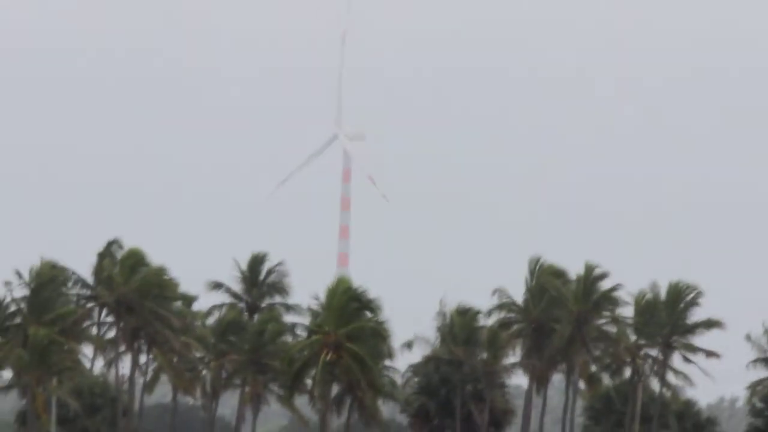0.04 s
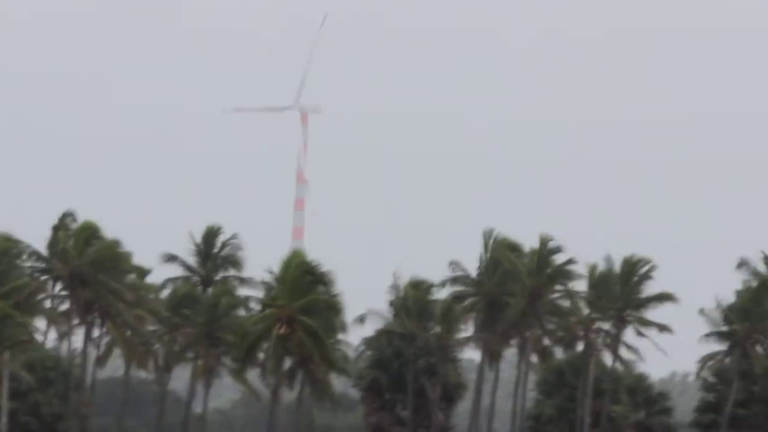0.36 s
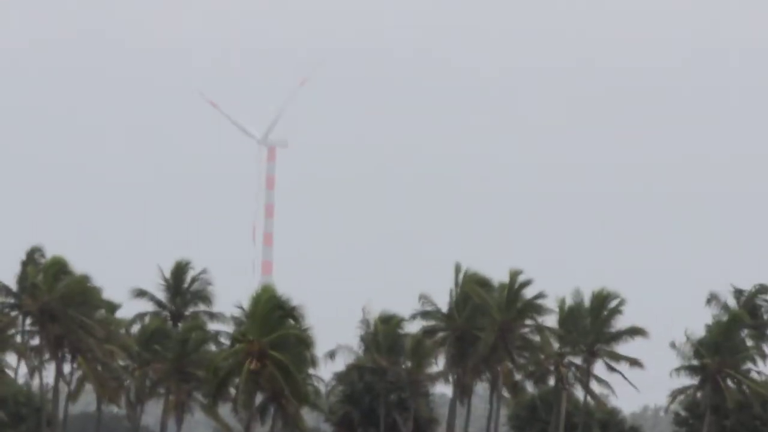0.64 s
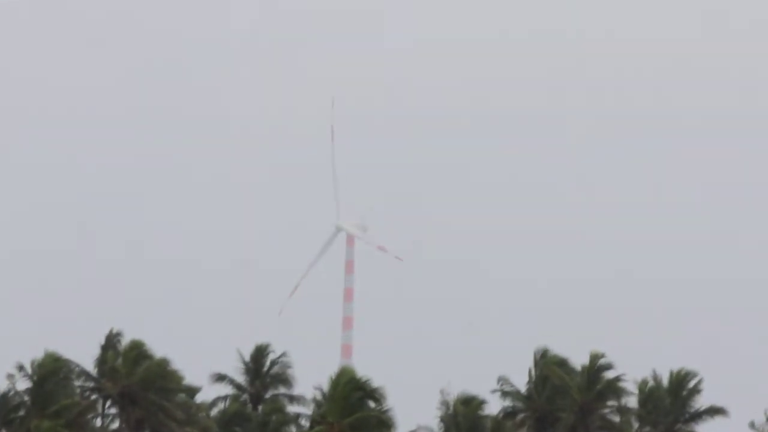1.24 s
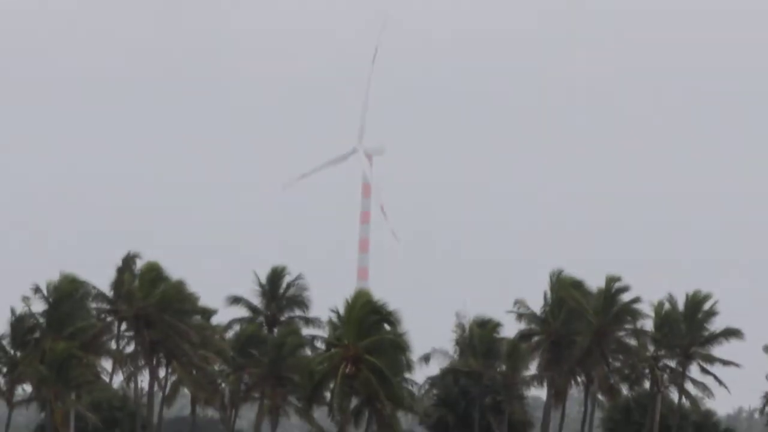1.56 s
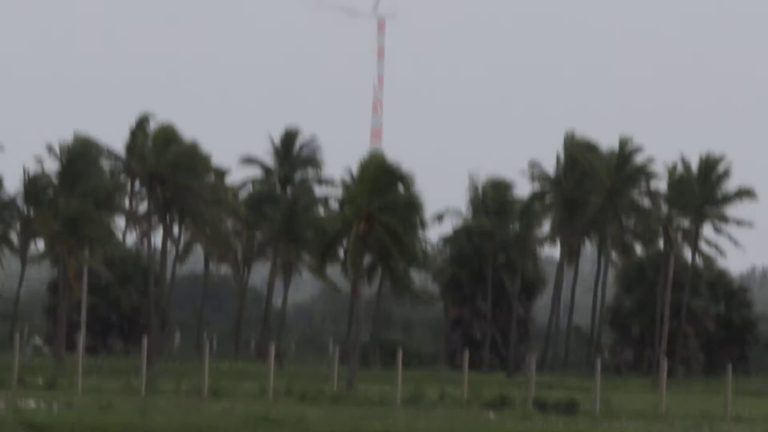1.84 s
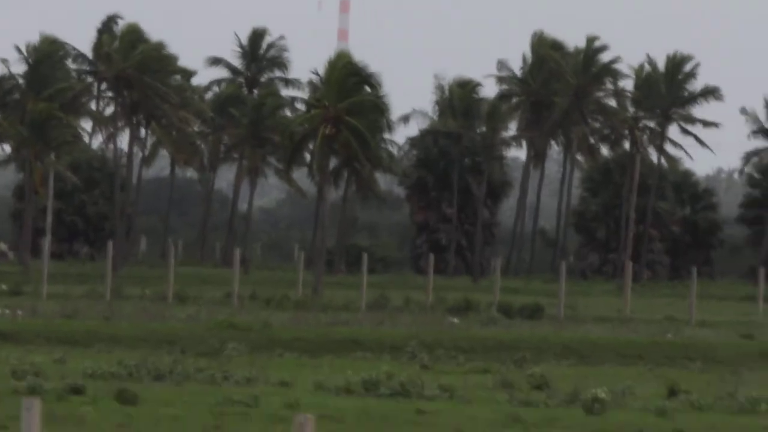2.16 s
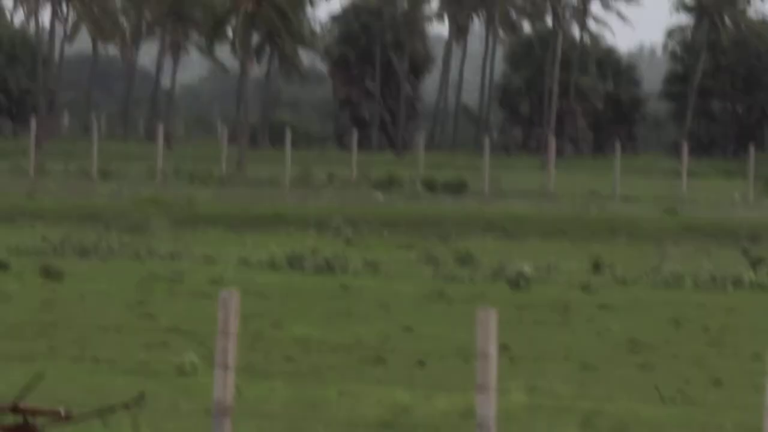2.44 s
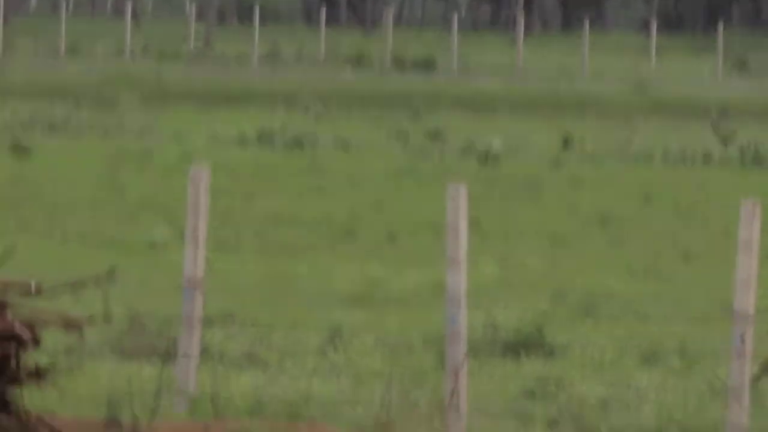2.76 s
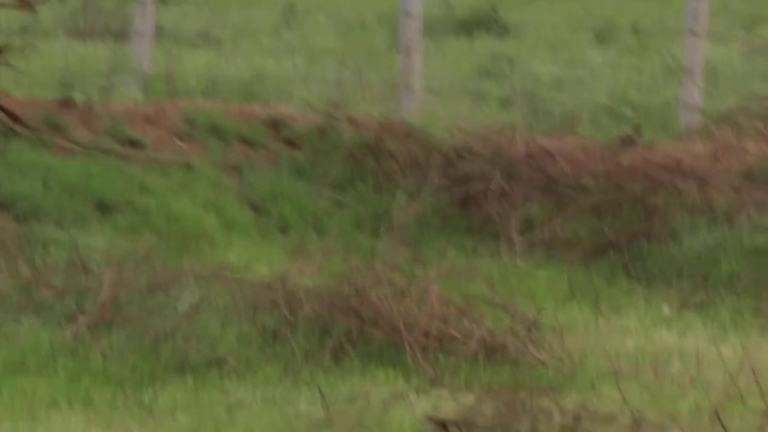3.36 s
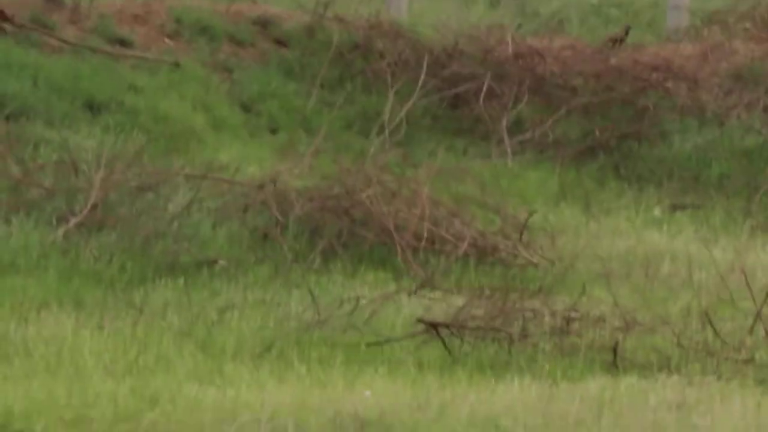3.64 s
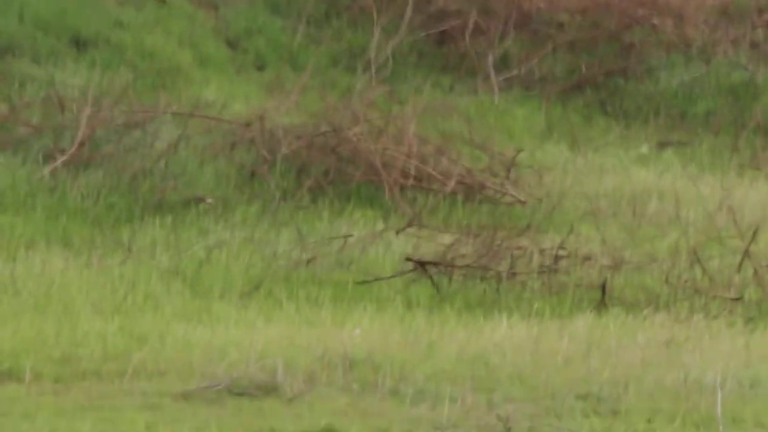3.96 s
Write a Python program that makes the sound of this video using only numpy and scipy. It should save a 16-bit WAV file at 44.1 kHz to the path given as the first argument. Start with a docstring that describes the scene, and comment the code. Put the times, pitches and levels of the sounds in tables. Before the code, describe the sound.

Wind buffets the microphone in quick, irregular gusts, making a low, fluttering rumble that eases a little near the end. Behind it, distant palms rustle faintly across an open field, with a few small leaf crackles and ticks.

```python
"""Wind on a camera microphone

Gusts buffet a hand-held camera in a field edged by palms. Eddies rumble at the microphone port,
brighter as the air speeds up. Far fronds rustle, nearer leaves crackle; a faint trill, a hollow
swish and dry ticks come and go. Gain control ducks everything, the camera's own hiss and whine
included, after each hard gust."""
import sys
import numpy as np
from scipy import signal
from scipy.fft import rfft, irfft
from scipy.io import wavfile
from scipy.ndimage import uniform_filter1d, minimum_filter1d

SR = 44100
rng = np.random.default_rng(int(sys.argv[2]) if len(sys.argv) > 2 else 0)


def persist_wave(psi):
    """Save psi, clipped to +-1, as 16-bit WAV."""
    counts = np.round(np.clip(psi, -1, 1) * 32767).astype(np.int16)
    wavfile.write(sys.argv[1], SR, np.atleast_2d(counts).T)


N = 176400
TIME_S, FREQ_HZ = np.arange(N) / SR, np.fft.rfftfreq(N, 1 / SR)

# airflow at the port (time [s], relative level [dB], base eddy corner [Hz])
AIRFLOW = [(0.0, 0, 114), (0.1, -18, 290), (0.22, -14, 423), (0.33, -12.5, 390), (0.5, -8.5, 550),
           (0.7, -17, 364), (0.84, -14, 364), (1.02, -11.5, 390), (1.29, -18, 226), (1.46, -10.5, 270),
           (1.62, -9.5, 190), (1.72, -13.5, 150), (1.88, -14.5, 390), (2.02, -16, 600), (2.1, -23, 136),
           (2.21, -22, 114), (2.33, -6, 68), (2.43, -24.5, 180), (2.58, -23, 61), (2.7, -7.5, 90),
           (2.82, -10.5, 250), (2.92, -35, 225), (2.98, -12, 12), (3.12, -20, 28), (3.19, -12.5, 285),
           (3.28, -20, 184), (3.47, -13, 220), (3.62, -18, 500), (3.76, -27, 264), (3.89, -22, 431),
           (4.0, -27, 130)]
# single gusts (centre [s], length [s], relative level [dB], base eddy corner [Hz])
GUSTS = [(0.003, 0.013, -4.5, 503), (0.083, 0.0094, -5.5, 220), (0.145, 0.034, -6, 333),
         (0.173, 0.013, -2.5, 530), (0.275, 0.03, -13, 650), (0.315, 0.013, -26, 420),
         (0.359, 0.012, -8, 540), (0.389, 0.016, -1, 450), (0.418, 0.022, 0, 543),
         (0.473, 0.008, -3.5, 1000), (0.493, 0.03, -8, 523), (0.534, 0.011, -8, 702),
         (0.572, 0.015, -10.5, 494), (0.603, 0.0096, -7, 573), (0.628, 0.02, -10.5, 483),
         (0.661, 0.04, -15, 486), (0.727, 0.026, -11.5, 348), (0.772, 0.015, -5.5, 456),
         (0.865, 0.0081, -11, 401), (0.894, 0.01, -12.5, 630), (0.914, 0.011, -9, 389),
         (0.953, 0.015, -5, 722), (0.985, 0.029, -12, 797), (1.023, 0.013, -16.5, 623),
         (1.075, 0.028, -3, 534), (1.132, 0.018, -8.5, 478), (1.172, 0.015, -15, 615),
         (1.194, 0.025, -9.5, 452), (1.226, 0.024, -6, 352), (1.319, 0.01, -9.5, 283),
         (1.375, 0.029, -10.5, 327), (1.4, 0.02, -10.5, 318), (1.427, 0.013, 0, 678),
         (1.482, 0.023, -13.5, 468), (1.512, 0.0063, -3, 324), (1.548, 0.0095, -14, 264),
         (1.6, 0.018, 4.5, 310), (1.724, 0.0084, -10.5, 316), (1.775, 0.011, -12, 552),
         (1.811, 0.015, -13.5, 701), (1.847, 0.039, -5, 470), (1.892, 0.048, -11.5, 343),
         (1.978, 0.025, -6, 425), (2.01, 0.0056, -4.5, 534), (2.164, 0.023, -9.5, 377),
         (2.242, 0.022, -15, 310), (2.28, 0.005, -21.5, 290), (2.335, 0.035, -15, 424),
         (2.377, 0.028, -11, 280), (2.485, 0.023, -6, 202), (2.543, 0.017, -20.5, 212),
         (2.656, 0.021, -10.5, 345), (2.684, 0.014, -22.5, 420), (2.74, 0.025, -9.5, 267),
         (2.78, 0.032, -4, 330), (2.838, 0.011, -6, 307), (2.907, 0.032, -17.5, 326),
         (3.173, 0.029, -8, 318), (3.225, 0.011, -24.5, 498), (3.336, 0.038, -16, 294),
         (3.372, 0.016, -14.5, 306), (3.432, 0.0099, -20.5, 326), (3.51, 0.025, -21.5, 380),
         (3.558, 0.03, -6.5, 379), (3.609, 0.014, -9, 460), (3.64, 0.02, -11.5, 580),
         (3.67, 0.031, -13.5, 634), (3.699, 0.018, -9.5, 910), (3.801, 0.02, -15.5, 565),
         (3.868, 0.026, -12, 730), (3.935, 0.0087, -10, 290), (3.983, 0.016, -17, 525)]
# port response (frequency [Hz], gain [dB])
PORT_RESPONSE = [(20, -15.5), (45, -3), (110, 3), (250, 2.5), (500, 0), (1000, -0.5), (2000, -1),
                 (3000, -7.5), (4200, -17), (6000, -29.5)]
# far palm wash (frequency [Hz], relative density [dB])
PALM_SPECTRUM = [(100, 6), (350, -1), (600, 1.5), (900, -4), (1300, -6), (1900, -9.5), (2400, -12.5),
                 (3100, -20.5), (4500, -24), (6500, -32), (10000, -39)]
# far palm wash (time [s], level [dB])
PALM_ENVELOPE = [(0, -43), (.6, -44.5), (.85, -41.5), (1.2, -43.5), (1.6, -42.5), (1.95, -43), (2.14, -40),
                 (2.3, -42), (2.7, -40.5), (2.9, -41.5), (3.1, -39), (3.4, -40.5), (4, -41)]
# camera hiss (frequency [Hz], relative density [dB])
HISS_SPECTRUM = [(100, -3), (4000, 6), (7500, 1), (11000, -0.5), (15500, 0.5)]
# camera whines (frequency [Hz], width [Hz], level [dB])
WHINES = [(15715, 12, -62.5), (7450, 250, -79.5)]
# high trill (time [s], level [dB])
TRILL_ENVELOPE = [(.7, -87), (.9, -79), (1.4, -78.5), (1.7, -77.5), (1.9, -91.5), (2.15, -76), (2.47, -73),
                  (2.55, -90)]
# near leaf crackles (onset [s], nominal peak [dB], centre [Hz])
CRACKLES = [(.783, -43, 3900), (.794, -42, 4000), (.820, -40.5, 4300), (.902, -44, 4000),
            (1.513, -41, 4100), (1.530, -44, 4000), (2.084, -43.5, 3900), (2.107, -42, 3900),
            (2.128, -41, 4000), (2.166, -38, 4000), (3.151, -47, 4840), (3.375, -44, 4000),
            (3.93, -42.5, 3200)]
# hollow swish (time [s], level [dB], centre [Hz])
SWISH_TRACK = [(.95, -68, 1800), (1.05, -50, 1750), (1.2, -42, 1700), (1.31, -51, 1640), (1.37, -73, 1645),
               (1.98, -70, 1700), (2.08, -48, 1750), (2.18, -51, 1750), (2.27, -62, 2200),
               (2.35, -51, 2350), (2.48, -52, 2350), (2.62, -65, 2300)]
# dry ticks (onset [s], nominal peak [dB])
TICKS = [(1.184, -26), (1.241, -24.5), (1.614, -30), (3.176, -35)]


def amp(db):
    """Decibels to gain."""
    return 10 ** (np.asarray(db) / 20)


def unit_rms(x):
    """Scale to rms 1."""
    return x / np.sqrt(np.mean(x ** 2) + 1e-20)


def curves(rows, time_s=TIME_S):
    """Linear interpolation of each column of a time table."""
    knots_s, *columns = np.transpose(rows)
    return [np.interp(time_s, knots_s, column) for column in columns]


def spectrum_gain(rows, hz=FREQ_HZ):
    """Gain from a spectrum table, log-frequency axis."""
    knots_hz, db = np.transpose(rows)
    return amp(np.interp(np.log(hz + 1), np.log(knots_hz), db))


def noise(gain):
    """Spectrally shaped noise, rms 1."""
    return unit_rms(irfft(rfft(rng.standard_normal(N)) * gain, N))


def noisy_tone(hz, width_hz):
    """Narrow noise on a carrier, rms 1."""
    shape = 1 / (1 + (2 * FREQ_HZ / width_hz) ** 4)
    phase = 2 * np.pi * np.cumsum(hz * np.ones(N)) / SR
    return unit_rms(noise(shape) * np.cos(phase) + noise(shape) * np.sin(phase))


def burst(onset_s, peak_db, decay_s):
    """Exponential envelope for noise of crest factor 2."""
    decay = np.exp(-np.minimum(abs(TIME_S - onset_s) / decay_s, 20))
    return amp(peak_db) / 2 * (TIME_S >= onset_s) * decay


def eddy_density(hz, db, corner_hz, rolloff=4.33):
    """Turbulence power per Hz: flat at low frequency, steep fall past the corner."""
    return np.pi * amp(db) ** 2 / corner_hz / (1 + (hz / corner_hz) ** 2) ** rolloff


def port_power(bands_hz, time_s, brightness):
    """Half-octave eddy power of flow plus steep-flanked gusts, filtered by the port."""
    flow_trim_db, gust_brightening, gust_steepness, low_cut_hz = -1, 1.079, 3.36, 79
    flow_db, flow_hz = curves(AIRFLOW, time_s)
    density = eddy_density(bands_hz, flow_db + flow_trim_db, flow_hz * brightness)
    for centre_s, length_s, db, base_hz in GUSTS:
        near = abs(time_s - centre_s) < length_s
        swell = np.exp(-abs(2 * (time_s[near] - centre_s) / length_s) ** gust_steepness)
        corner_hz = base_hz * gust_brightening * np.sqrt(brightness[near])  # half the flow's flutter
        density[:, near] += swell * eddy_density(bands_hz, db, corner_hz)
    width_hz = bands_hz * np.log(2) / 2
    response = spectrum_gain(PORT_RESPONSE, bands_hz) ** 2 / (1 + (low_cut_hz / bands_hz) ** 2)
    return density * width_hz * response


def half_octave(hz):
    """Soft-edged noise band around hz."""
    octaves = np.log2((FREQ_HZ + 1e-9) / hz)
    return noise(np.cos(np.pi / 2 * np.clip(2 * octaves, -1, 1)))


def steadied(x, power, window_s=0.029, share=0.81):
    """Pull the short-term power of x toward a target curve."""
    span = int(window_s * SR)
    target, actual = (abs(uniform_filter1d(uniform_filter1d(p, span), span // 2)) + 1e-12
                      for p in (power, x ** 2))
    return x * np.sqrt(target / actual) ** share


def wind(level_db=-1, flutter_db=1.46, flutter_octaves=0.27):
    """Eddies at the port; turbulence shakes their strength and brightness together."""
    control_s = TIME_S[::32]
    low_hz, high_hz = 29.2, 198
    flutter_band = 1 / (1 + (low_hz / (FREQ_HZ + 1)) ** 4) / (1 + (FREQ_HZ / high_hz) ** 4)
    flutter = np.interp(control_s, TIME_S, noise(flutter_band / np.sqrt(FREQ_HZ + 1)))
    bands_hz = 20 * 2 ** (np.arange(17) / 2)
    power = port_power(bands_hz[:, None], control_s, brightness=2 ** (flutter_octaves * flutter))
    rumble = np.zeros(N)
    for group in np.split(np.arange(len(bands_hz)), [7, 10]):  # low, mid, high
        eddies = sum(half_octave(bands_hz[k]) * np.interp(TIME_S, control_s, np.sqrt(power[k]))
                     for k in group)
        rumble += steadied(eddies, np.interp(TIME_S, control_s, power[group].sum(0)))
    return rumble * amp(level_db + flutter_db * np.interp(TIME_S, control_s, flutter))


def far_palms():
    """Distant fronds merge into a smooth wash."""
    return noise(spectrum_gain(PALM_SPECTRUM)) * amp(curves(PALM_ENVELOPE)[0])


def leaf_noise(hz, width_octaves=0.28):
    """Noise band of a leaf, Gaussian in log frequency."""
    return noise(np.exp(-0.5 * (np.log2((FREQ_HZ + 1) / hz) / width_octaves) ** 2))


def near_leaves(snaps_per_s=23, rustle_db=-76.5, spread_db=5, decay_s=0.0058):
    """Nearer leaves: a faint rustle of random snaps, plus distinct crackles."""
    onsets = rng.random(N) < snaps_per_s / SR
    snaps = onsets * amp(spread_db * np.minimum(rng.exponential(1, N), 4))
    grains = signal.lfilter([1], [1, -np.exp(-1 / (decay_s * SR))], snaps)
    rustle = amp(rustle_db) * unit_rms(grains * leaf_noise(hz=4500))
    return rustle + sum(burst(onset_s, db, decay_s) * leaf_noise(hz) for onset_s, db, hz in CRACKLES)


def camera_noise(hiss_db=-59):
    """Camera self-noise: hiss and thin, wavering whines."""
    hiss = amp(hiss_db) * noise(spectrum_gain(HISS_SPECTRUM))
    return hiss + sum(amp(db) * noisy_tone(hz, width_hz) for hz, width_hz, db in WHINES)


def trill(throb_hz=7.5):
    """Faint high band, throbbing like a far insect."""
    throb = 1 + np.sin(2 * np.pi * throb_hz * TIME_S) / 2
    return amp(curves(TRILL_ENVELOPE)[0]) * throb * noisy_tone(hz=9560, width_hz=220)


def swish():
    """Broad, faint resonance that comes and goes, drifting in pitch."""
    db, hz = curves(SWISH_TRACK)
    return amp(db) * noisy_tone(hz, width_hz=670)


def ticks(decay_s=0.00018):
    """Dry ticks: very short bursts of white noise."""
    return sum(burst(onset_s, db, decay_s) for onset_s, db in TICKS) * rng.standard_normal(N)


def scene():
    """Mono sum of the field sounds and camera self-noise."""
    return (wind() + far_palms() + near_leaves() + camera_noise() + trill() + swish() + ticks())[None]


def gain_control(x, threshold_db=-11, share=0.8, attack_s=0.012, recovery_db_per_s=27):
    """Remove a share of the level above threshold; fast attack, slow recovery."""
    span = int(attack_s * SR)
    level_db = 10 * np.log10(abs(uniform_filter1d(x[0] ** 2, span)) + 1e-12)
    cut_db = share * np.maximum(level_db - threshold_db, 0)
    recovery_db = TIME_S * recovery_db_per_s
    held_db = np.maximum.accumulate(cut_db + recovery_db) - recovery_db
    return x / amp(uniform_filter1d(held_db, span // 2))


def limiter(x, ceiling=0.97, hold_s=0.003):
    """Brief, smooth gain dips round off peaks."""
    hold = int(hold_s * SR)
    gain = minimum_filter1d(1 / np.maximum(abs(x) / ceiling, 1), 2 * hold)
    return x * uniform_filter1d(uniform_filter1d(gain, hold), hold)


def record(dry):
    """Camera chain: gain control, limiter, low-pass."""
    cutoff_hz = 15830
    lowpass = signal.firwin(1023, cutoff_hz, window=("kaiser", 9), fs=SR)
    return signal.oaconvolve(limiter(gain_control(dry)), lowpass[None], "same")


dry = scene()
out = record(dry)
persist_wave(out)
```